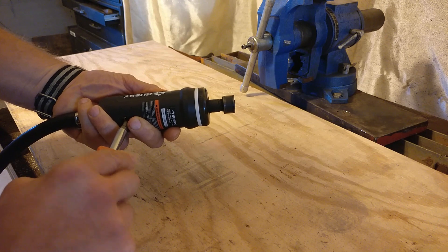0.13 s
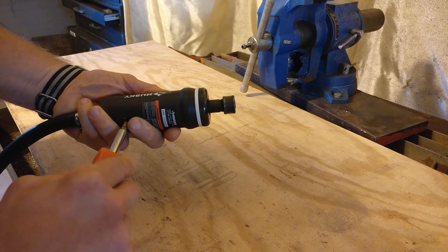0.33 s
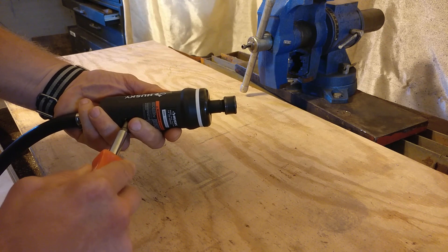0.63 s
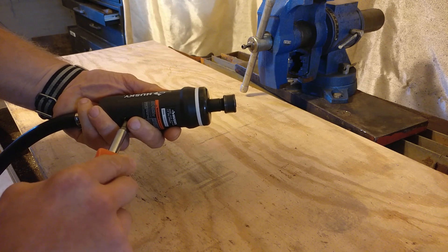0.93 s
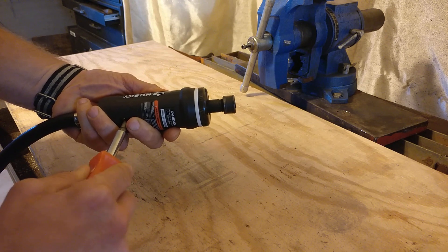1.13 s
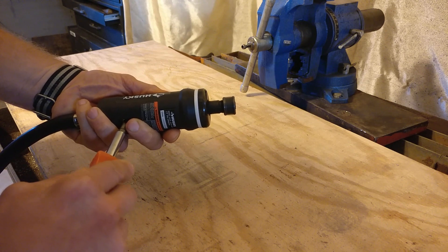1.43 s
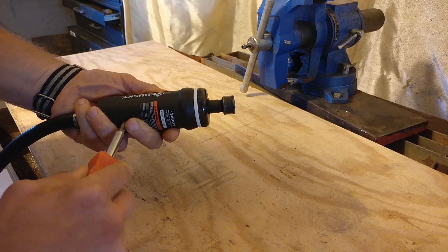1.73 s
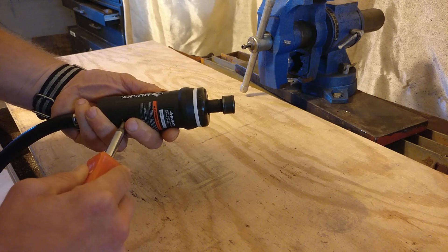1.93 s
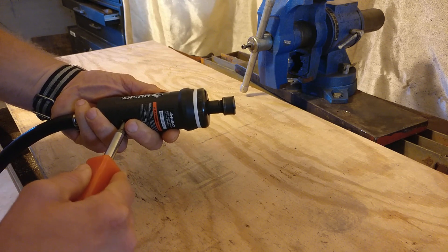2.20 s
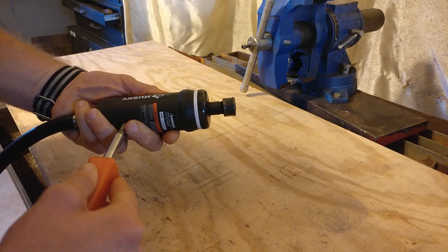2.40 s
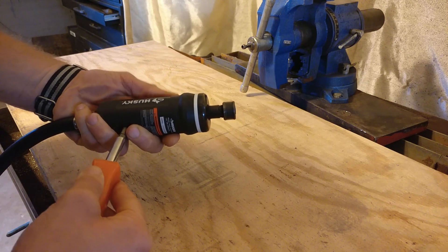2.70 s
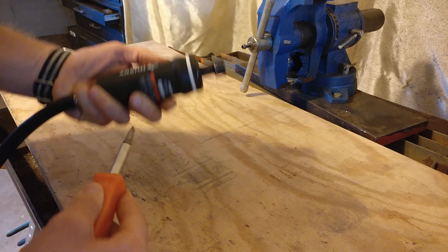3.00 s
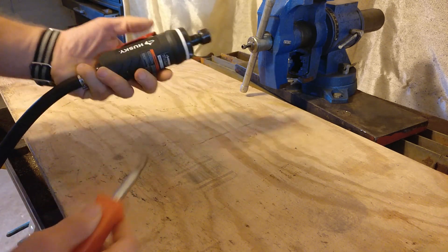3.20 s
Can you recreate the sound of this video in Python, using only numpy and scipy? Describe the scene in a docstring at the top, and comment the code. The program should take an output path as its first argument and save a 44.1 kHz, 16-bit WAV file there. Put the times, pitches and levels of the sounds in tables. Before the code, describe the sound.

A handheld air die grinder winds down, is throttled up three times into a piercing whine over rushing air, holds steady at full speed, then drops away quickly and ends with a lever click; small workshop, close microphone.

```python
"""A small workshop, one microphone: a four-vane air die grinder runs free over a wooden bench.
It coasts down, is throttled up three times, the last to a held full speed, then shut off.
The vanes chop the exhaust into a whine, a sum of swept harmonics, over a loud hiss of gated noise.
Loose vanes tick at low speed; with little air the vanes pump a falling hoot of their own.
A soft thud marks the air being cut, and at the end the throttle lever snaps back in two clicks."""
import sys
import numpy as np
from scipy import signal
from scipy.fft import rfft, irfft
from scipy.io import wavfile
from scipy.ndimage import uniform_filter1d

SR = 44100
rng = np.random.default_rng(int(sys.argv[2]) if len(sys.argv) > 2 else 0)


def wav_record(signal):
    """Record a signal, one row per channel, as 16-bit PCM in the file named by sys.argv[1]."""
    frames = np.transpose(np.atleast_2d(signal))
    bounded = np.clip(frames, -1, 1)
    # unit amplitude maps onto the largest positive 16-bit level
    quanta = np.round(bounded * 32767).astype(np.int16)
    wavfile.write(sys.argv[1], SR, quanta)


N = 147735
T = np.arange(N) / SR
VANES = 4


def amp(db):
    """Amplitude ratio of a level in dB."""
    return 10 ** (np.asarray(db) / 20)


def unit(x):
    """Scales to rms 1."""
    return x / np.sqrt(np.mean(x ** 2) + 1e-20)


def curve(points):
    """Straight lines through (time, value) points, at every sample."""
    return np.interp(T, *np.transpose(points))


def read(points, hz):
    """Reads (frequency, value) points along a log frequency axis."""
    f, value = np.transpose(points)
    return np.interp(np.log(hz + 1), np.log(f + 1), value)


def colour(x, points):
    """Filters by a spectrum, keeping the power of white noise."""
    size = 2 * len(x)  # padded, so the end does not wrap onto the start
    gain = unit(amp(read(points, np.fft.rfftfreq(size, 1 / SR))))
    return irfft(rfft(x, size) * gain, size)[:len(x)]


def drift(rate_hz):
    """Smooth chance of rms 1: noise low-passed at rate_hz."""
    step = 32  # samples between computed points
    slow = np.arange(N // step + 2) * step / SR
    hz = np.fft.rfftfreq(len(slow), step / SR)
    spectrum = rfft(rng.standard_normal(len(slow))) / (1 + (hz / rate_hz) ** 2)
    return np.interp(T, slow, unit(irfft(spectrum, len(slow))))


# rate at which vanes pass the exhaust port, before smoothing and wobble [t/s, f/Hz]
SPEED = [(0, 643), (.094, 447.4), (.15, 320), (.195, 230.6), (.254, 172.1), (.32, 134.5), (.4, 106.2),
         (.48, 98), (.52, 164.5), (.555, 349.3), (.59, 614.6), (.62, 797.5), (.66, 949), (.7, 1028),
         (.74, 1062), (.83, 1063), (.88, 1032), (1.05, 812.4), (1.08, 770), (1.13, 639.6), (1.17, 602.6),
         (1.225, 574), (1.26, 672), (1.3, 926), (1.345, 1152), (1.42, 1164), (1.49, 1138), (1.63, 1039),
         (1.79, 869), (1.82, 769), (1.85, 716), (1.89, 787.3), (1.95, 1027), (1.99, 1124), (2.13, 1308),
         (2.23, 1361), (2.55, 1365), (2.75, 1362), (2.84, 1353), (2.866, 1330), (2.896, 1093), (2.925, 744),
         (2.95, 510.6), (2.978, 352), (3.006, 255), (3.052, 159.6), (3.1, 110), (3.3, 35.5)]
WOBBLE = .0006  # rms, as a fraction of the rate
JITTER_TURNS = .006  # rms, in vane passages


def rotor():
    """Vane rate, and its integral: the count of vanes passed."""
    smooth_hz = uniform_filter1d(curve(SPEED), size=500, mode="nearest")
    hz = smooth_hz * (1 + WOBBLE * drift(12))
    return hz, np.cumsum(hz) / SR + JITTER_TURNS * drift(200)


# air flow through the exhaust, as hiss before its colour [t/s, level/dB]
AIR = [(0, -33.5), (.07, -36), (.16, -42.5), (.25, -51.5), (.4, -54), (.48, -52.5), (.51, -46.5),
       (.55, -37.5), (.59, -33.5), (.7, -31.5), (1.05, -31), (1.24, -35.5), (1.34, -28.5), (1.55, -30.5),
       (1.86, -33), (2.0, -31), (2.15, -25.5), (2.55, -26), (2.86, -26.5), (2.93, -36), (3.0, -44),
       (3.1, -57), (3.3, -77.5)]
FULL_DB, SLIGHT_DB = -25, -42  # hiss at which the flow counts as full and as slight


def fullness():
    """How far the throttle is open, 0-1, taken from the air flow."""
    return np.clip((curve(AIR) - SLIGHT_DB) / (FULL_DB - SLIGHT_DB), 0, 1)


# strength of the whine, all but the two leading harmonics [t/s, level/dB]
WHINE = [(0, -6), (.085, -7), (.15, -42), (.3, -41), (.48, -36), (.56, -8.5), (.64, -1.5), (.8, 0.5),
         (1.0, -3.5), (1.15, -3.5), (1.24, -5.5), (1.31, 5), (1.45, -1), (1.6, 3), (1.75, -2.5),
         (1.81, 0.5), (1.87, -7), (1.95, 3.5), (2.2, 4), (2.83, 4), (2.88, 3.5), (2.95, -8.5), (3.05, -21),
         (3.3, -80)]
# response of housing and exhaust port to the vane pulses [f/Hz, level/dB]
PORT = [(100, -66), (150, -47.5), (220, -58), (330, -47.5), (550, -54), (850, -43), (1100, -41),
        (1400, -39.5), (1900, -36.5), (2400, -34.5), (3000, -34.5), (3700, -43), (4400, -43.5), (5000, -41),
        (5450, -33), (5900, -38.5), (6500, -38), (7300, -43), (8200, -50.5), (9500, -58.5), (12000, -75.5),
        (16000, -67)]
# vane harmonics 2 and 3 swell and fade on their own [number: t/s, level/dB]
LEADING = {2: [(0, -32.5), (.06, -43), (.13, -69), (.3, -96), (.52, -57), (.6, -43), (.67, -33.5),
           (.73, -50), (.82, -47), (.87, -37), (1.1, -32.5), (1.22, -39.5), (1.4, -38.5), (1.6, -37.5),
           (1.8, -33.5), (2.05, -36.5), (2.2, -30), (2.87, -31.5), (2.95, -46), (3.1, -105)],
           3: [(0, -34.5), (.085, -34.5), (.14, -92), (.5, -59), (.6, -50.5), (.65, -30), (.79, -24),
           (.88, -30.5), (.93, -36.5), (1.19, -35), (1.26, -48), (1.3, -26), (1.4, -32.5), (1.6, -27),
           (1.72, -35), (1.86, -41), (1.93, -25.5), (2.05, -35.5), (2.2, -33), (2.85, -30.5), (2.91, -37),
           (2.96, -36), (3.1, -105)]}
# the other vane harmonics; higher ones keep the last row [number: level/dB, gain at full flow/dB]
HARMONICS = {1: (0, -12), 4: (-1, 5), 5: (0, 0), 6: (1, -4), 7: (2, -7), 8: (-2, -8)}
FLUTTER_DB = 2
# unlike vanes add shaft harmonics a quarter, half and three quarters of the way up to each
# vane harmonic; higher ones keep the last row [level/dB, level/dB, level/dB]
UNEVEN_DB = [(-23, -15.5, -20), (-10.5, -14, -7), (-34.5, -14.5, -6), (-15, -7.5, -10), (-1.5, -38, -4),
             (-14, -15.5, -20)]
UNEVEN_SPREAD_DB, UNEVEN_FLUTTER_DB, UNEVEN_FULL_DB = 1.5, 2.5, -4  # the last at full flow


def whine(hz, turns):
    """Vane and weaker shaft harmonics sweep through the port's resonances; two have their own levels."""
    full = fullness() ** 6
    strength_db = curve(WHINE)
    out = np.zeros(N)
    for k in range(1, 12 * VANES + 1):  # shaft harmonics; every fourth is a vane harmonic
        order, number = k / VANES, k // VANES
        chance = rng.standard_normal()
        db = strength_db + read(PORT, order * hz)
        if k % VANES:
            db += UNEVEN_DB[min(number, len(UNEVEN_DB) - 1)][k % VANES - 1]
            db += UNEVEN_FULL_DB * full
            db += UNEVEN_SPREAD_DB * chance + UNEVEN_FLUTTER_DB * drift(14)
        elif number in LEADING:
            db = curve(LEADING[number]) + FLUTTER_DB / 2 * drift(36)
        else:
            base_db, full_db = HARMONICS[min(number, max(HARMONICS))]
            db += base_db + full_db * full
            db += FLUTTER_DB * (1 - full / 2) * drift(8.3)  # steadier at full flow
        out += amp(db) * np.cos(2 * np.pi * (order * turns + rng.random()))
    return np.sqrt(2) * out


# shape of the exhaust hiss at full flow [f/Hz, level/dB per Hz]
HISS_FULL = [(30, -39), (150, -25.5), (400, -22.5), (800, -18), (1400, -10), (2000, -5.5), (2600, -3),
             (3300, -5), (3900, -12.5), (4800, -1), (5600, -4.5), (6400, 4), (7100, 0), (7800, -7),
             (9200, -15.5), (11000, -25), (13500, -32), (15700, -24)]
# shape of the exhaust hiss at slight flow [f/Hz, level/dB per Hz]
HISS_SLIGHT = [(30, -79.5), (150, -40.5), (400, -19.5), (800, -16.5), (1400, 5), (2000, 5), (2600, 9.5),
               (3300, 6), (3900, 2.5), (4800, 3.5), (5600, 6.5), (6400, 6.5), (7100, 5.5), (7800, -17),
               (9200, -9), (11000, -53), (13500, -30), (15700, -50)]
PUFF_TURNS = .14  # decay of a puff, in vane passages
PUFF_FAST, PUFF_SLOW, PUFF_BELOW_HZ = .8, 2.5, 260  # puff height; the slow part adds below this rate
SHAFT_THROB = 0.24  # depth of the swell once a shaft turn


def exhaust(hz, turns):
    """Hiss that leaves in one puff per vane: separate putters when slow, a brighter rush at full flow."""
    height = PUFF_FAST + PUFF_SLOW / (1 + (hz / PUFF_BELOW_HZ) ** 4)
    puffs = 1 + height * np.exp(-(turns % 1) / PUFF_TURNS)
    throb = 1 + SHAFT_THROB * np.cos(2 * np.pi * turns / VANES)
    gate = puffs * throb
    gate = gate / np.sqrt(uniform_filter1d(gate ** 2, size=1500))  # even local power
    air = gate * rng.standard_normal(N) * amp(curve(AIR))
    full = fullness()
    return full * colour(air, HISS_FULL) + (1 - full) * colour(air, HISS_SLIGHT)


# loose vanes slap the bore, mostly at low speed [t/s, level/dB]
SLAPS = [(0, -51), (.1, -34.5), (.2, -46), (.31, -51), (.4, -54), (.48, -62.5), (.52, -51), (.59, -35.5),
         (.66, -60), (2.86, -68), (2.92, -29), (2.97, -39), (3.05, -59), (3.15, -95)]
# colour of the slaps [f/Hz, level/dB]
SLAP_COLOUR = [(60, -30), (200, -13), (600, -7), (1100, -2), (1600, -2), (2150, 2.5), (2600, -8.5),
               (3300, -13), (4500, -8), (6500, -4.5), (8000, -21), (16000, -59)]
SLAP_SPREAD_DB, SLAP_RING_S = 3, .0007


def slaps(hz, turns):
    """One sharp tick per vane, each of its own strength, rings the housing briefly."""
    vane = np.round(np.maximum(turns, 0)).astype(int)
    strength = amp(SLAP_SPREAD_DB * rng.standard_normal(N))[vane]
    offset = (turns - vane) * SR / hz  # samples from the nearest tick
    ticks = np.sinc(offset) * np.sinc(offset / 4) * (abs(offset) < 4)  # falls between samples
    ticks = ticks * np.sqrt(SR / hz)  # even power at any rate
    ring = rfft(rng.standard_normal(N) * np.exp(-T / SLAP_RING_S))
    ring_phase = ring / (abs(ring) + 1e-9)  # smears the ticks without colouring them
    rung = irfft(rfft(strength * ticks * amp(curve(SLAPS))) * ring_phase, N)
    return colour(rung, SLAP_COLOUR)


# shape of the steady noise floor [f/Hz, level/dB per Hz]
FLOOR = [(25, -10.5), (70, 1), (150, -4.5), (400, -13), (1000, -54), (4000, -7), (15000, -24)]
FLOOR_DB = -79


def noise_floor():
    """Steady coloured noise under everything, strongest in the bass."""
    return amp(FLOOR_DB) * colour(rng.standard_normal(N), FLOOR)


# workshop reverberation time [f/Hz, t60/s]
ROOM = [(150, 0.65), (1000, 0.62), (2500, 0.38), (6000, 0.57), (9000, 0.35), (15000, 0.12)]
# bench, vice and wall close by, later than the direct sound [delay t/s, gain]
ECHOES = [(.0019, 0.098), (.0052, 0.12), (.0093, 0.079)]
WHINE_ROOM_DB, HISS_ROOM_DB = -18, -8  # level of the diffuse tail for tones and for noises


def workshop(x, room_db):
    """Near echoes and a diffuse tail of noise that dies at its own pace in each band."""
    hz, t, z = signal.stft(rng.standard_normal(SR), SR, nperseg=256)
    decay = amp(-60 * t / read(ROOM, hz)[:, None])
    onset = np.minimum(t / 0.004, 1)
    tail = signal.istft(z * decay * onset, SR, nperseg=256)[1]
    tail = tail / np.linalg.norm(tail)
    near = sum(gain * np.interp(T - delay, T, x, left=0) for delay, gain in ECHOES)
    return x + near + amp(room_db) * signal.fftconvolve(x, tail)[:N]


# spells of pumping at low pressure; level is the fundamental's at 1 kHz, before order and knee
# [start t/s, end t/s, onset t/s, level/dB]
COASTS = [(0.1, 0.358, 0.083, -23), (0.48, .55, 0.019, -19.5), (2.871, 2.903, .004, -27.5),
          (2.903, 3.119, 0.0047, -17.5)]
# harmonics of the hoot, from the first up [level/dB]
COAST_ORDER_DB = [0, 2.5, -4, -7, -11, -21]
COAST_EDGE_S, COAST_DB_PER_OCTAVE = 0.0043, 11  # fade-out at the end of each spell; rise with vane rate
COAST_KNEE_HZ, COAST_CUT_HZ = 212, 3700  # falls faster below the knee rate; harmonics die above the cut
COAST_BRIGHT_HZ = 600  # below this rate the hoot loses its overtones


def coasting(hz, turns):
    """With little pressure the vanes pump air themselves: a hollow hoot, duller and fainter when slower."""
    level = np.zeros(N)
    for start, end, onset, db in COASTS:
        edges = np.minimum((T - start) / onset, (end - T) / COAST_EDGE_S)
        level += amp(db) * np.clip(edges + .5, 0, 1)  # half open at start and end
    level *= amp(COAST_DB_PER_OCTAVE * np.log2(hz / 1000))
    level /= 1 + (COAST_KNEE_HZ / hz) ** 3
    bright = 1 / (1 + (COAST_BRIGHT_HZ / hz) ** 2)
    tone = np.zeros(N)
    for k, db in enumerate(COAST_ORDER_DB, 1):
        gain = amp(db) * (bright if k > 1 else 1) / (1 + (k * hz / COAST_CUT_HZ) ** 8)
        tone += gain * np.sin(2 * np.pi * k * turns)
    return np.sqrt(2) * level * tone


# colour of the thud [f/Hz, level/dB]
THUD_COLOUR = [(20, -16), (70, 4), (200, -1), (500, -25), (2000, -59), (16000, -116)]
THUD_S, THUD_WIDTH_S, THUD_DB = 2.905, .018, -55  # centre, half width to 1/e, level before the room


def valve():
    """A soft thud as the air is cut: a bell-shaped burst of low noise."""
    swell = np.exp(-((T - THUD_S) / THUD_WIDTH_S) ** 2)
    return amp(THUD_DB) * swell * colour(rng.standard_normal(N), THUD_COLOUR)


# lever clicks [t/s, level/dB]
CLICKS = [(3.3244, -30), (3.3266, -33)]
# colour of the clicks [f/Hz, level/dB]
CLICK_COLOUR = [(100, -42), (1000, -28), (2000, -7.5), (4000, 3.5), (6500, -0.5), (8200, 8), (11000, -18),
                (15700, -17)]
CLICK_DECAY_S, CLICK_RING_DB, CLICK_RING_S = 0.0013, -20, 0.01  # ring level is relative to the click


def lever():
    """The metal lever hits its stop and bounces once: noise bursts with a fast and a slow decay."""
    level = np.zeros(N)
    for start, db in CLICKS:
        age = np.maximum(T - start, 0)
        decay = np.exp(-age / CLICK_DECAY_S) + amp(CLICK_RING_DB) * np.exp(-age / CLICK_RING_S)
        level += (T >= start) * amp(db) * decay
    return colour(level * rng.standard_normal(N), CLICK_COLOUR)


def scene():
    """The grinder in the workshop, heard in mono: the same signal on both channels."""
    hz, turns = rotor()
    tones = workshop(whine(hz, turns) + coasting(hz, turns), WHINE_ROOM_DB)
    noises = workshop(exhaust(hz, turns) + slaps(hz, turns) + valve() + lever(), HISS_ROOM_DB)
    mono = amp(-2.5) * (tones + noises) + noise_floor()
    return np.array([mono, mono])


EDGE_HZ = 15800


def record(dry):
    """The recorder's band limit: a steep low-pass at EDGE_HZ."""
    low_pass = signal.firwin(511, EDGE_HZ, window=("kaiser", 9), fs=SR)
    return signal.oaconvolve(dry, low_pass[None], "same")


dry = scene()
out = record(dry)
wav_record(out)
```